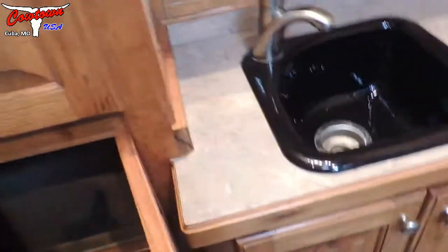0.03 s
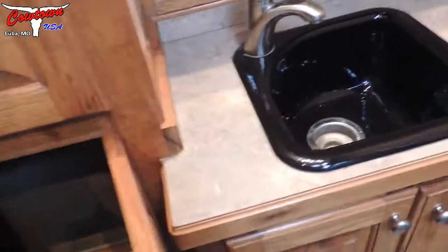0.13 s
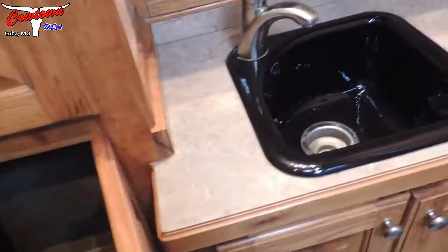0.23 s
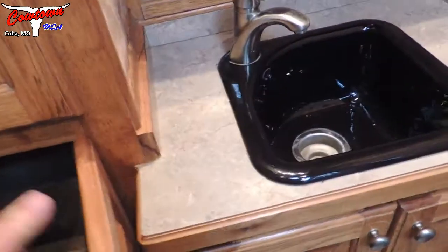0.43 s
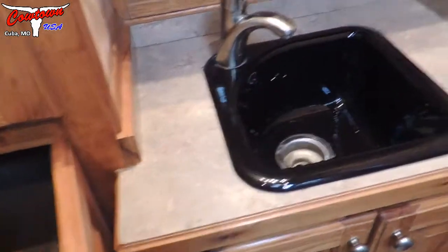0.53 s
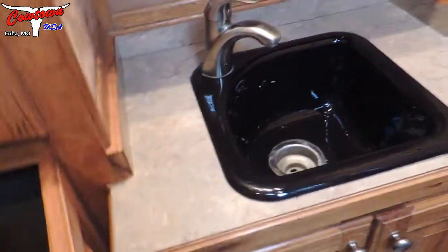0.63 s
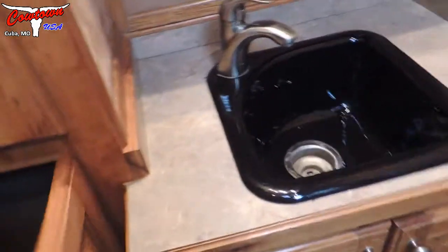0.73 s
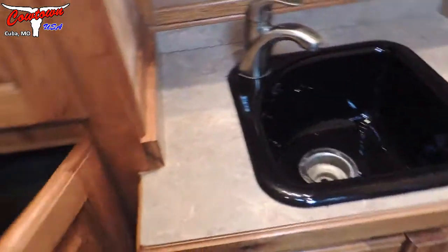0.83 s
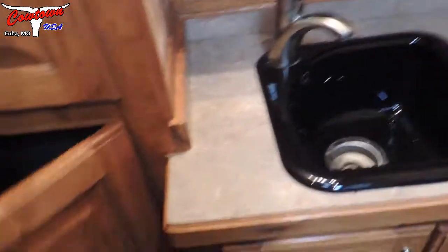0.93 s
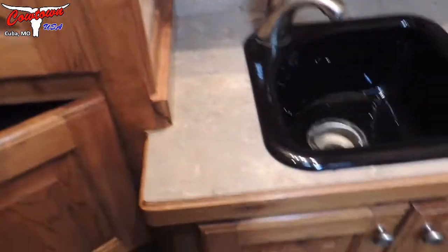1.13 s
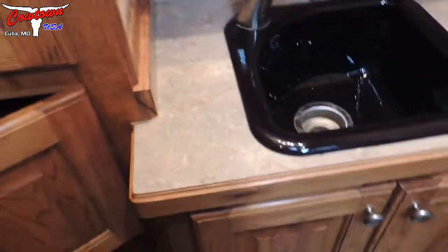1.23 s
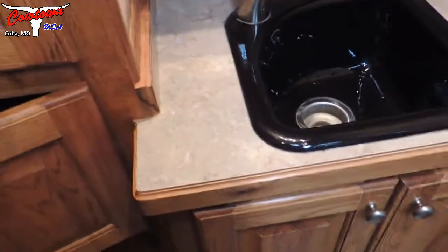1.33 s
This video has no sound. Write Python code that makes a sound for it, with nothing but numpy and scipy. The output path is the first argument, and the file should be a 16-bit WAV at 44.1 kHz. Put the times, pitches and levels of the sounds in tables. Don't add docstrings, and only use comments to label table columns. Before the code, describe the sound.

A wooden cabinet door slams shut with a light knock, catch snap and heavy booming bang

```python
import sys
import numpy as np
from scipy import signal
from scipy.fft import rfft, irfft
from scipy.io import wavfile
from scipy.ndimage import uniform_filter1d

SR = 44100
rng = np.random.default_rng(int(sys.argv[2]) if len(sys.argv) > 2 else 0)


def gain_from_decibels(decibels):
    exponent = np.asarray(decibels, float) / 20
    return 10 ** exponent


def generate_wav(sig):
    pcm = np.round(np.clip(np.atleast_2d(sig).T, -1, 1) * 32767).astype(np.int16)
    wavfile.write(sys.argv[1], SR, pcm)


N = 61739
T = np.arange(N) / SR
FREQ = np.maximum(np.fft.rfftfreq(N, 1 / SR), 1)
PORT_SIGN = np.array([[1], [-1]])

# (time [s], panel level [dB], catch snap level [dB], ring t60 [s], contact length [ms])
CONTACTS = [(0.0358, -26.5, -38.5, 0.06, 0.9), (0.0421, -29.5, -34, 0.024, 0.17),
            (.052, -27.5, -60.5, 0.087, 0.89), (.176, -31, -71, 0.041, 2.7), (0.1812, -22, -72, 0.089, 3.5),
            (.191, -27, -16.5, 0.05, .4), (.195, -15.5, -17, 0.019, .2), (.2, -10.5, -34.5, 0.0083, 0.23),
            (.2035, -1.5, -51, 0.011, .9), (.213, -10.5, 0.5, 0.082, 0.15), (0.2177, -8.5, -6.5, 0.044, .3),
            (.227, 1, -22.5, 0.013, 0.15), (.23, 10.5, -29.5, 0.091, 0.51), (.243, 1, -18.5, 0.03, 1.1),
            (0.254, 2.5, -31, 0.071, 2), (.262, -5, -21.5, 0.11, 1.5), (.274, -4, -46, 0.14, 2.4),
            (0.298, -12.5, -44, 0.02, 2.6), (0.329, -27, -51, 0.2, 0.87), (0.6929, -55, -41, .02, 0.35),
            (0.715, -64, -42.5, 0.022, 0.24)]
# (frequency [Hz], level [dB], t60 [s])
PANEL_MODES = [(317, -9.5, 0.053), (363.3, -5, .18), (399, -1, .2), (445, 2.5, 0.18), (510, -10, 0.084),
               (555, -16, 0.08), (619.6, -7.5, 0.081), (716, -7, 0.13), (913, -9.5, 0.2),
               (1100, -16.5, 0.18), (1227, -14, 0.1), (1420, -21.5, .14), (1727, -20, 0.26),
               (2200, -24, 0.033)]
# (frequency [Hz], density [dB per Hz])
SNAP_SPECTRUM = [(800, -38), (3000, 1.5), (5500, 2.5), (7000, -1), (8500, -7.5), (11000, -1), (14000, -1.5)]
# (frequency [Hz], density [dB per Hz])
KNOCK_SPECTRUM = [(250, -34.5), (340, -19), (420, -3), (560, -11), (1000, -10.5), (2200, -12.5),
                  (2900, -20.5), (9000, -29.5)]
# (time [s], level [dB], frequency [Hz], t60 [s])
CARCASS_BOOMS = [(0.048, -7, 76, 0.067), (.048, -27, 224.3, .25), (0.065, -13.5, 84.8, 0.12),
                 (.118, -10, 70.6, 0.064), (0.195, -12, 80, 0.1), (0.212, -11, 121, 0.27),
                 (0.224, -4, 191.5, 0.25), (0.246, -8, 154.7, .14), (.24, 1, 77.1, 0.096),
                 (.268, 7, 52.7, .1), (.272, -9, 193, 0.15), (0.32, -14, 141.7, 0.225),
                 (0.325, -1.5, 78.5, 0.08), (0.395, -14, 58, 0.14), (.435, -18, 62, 0.074)]
# (time [s], level [dB], frequency [Hz], t60 [s])
FOOT_THUMPS = [(0.621, -29, 48, .06), (.668, -25.5, 60, 0.21), (.688, -16, 51.6, 0.096),
               (0.776, -25, 95, .06), (0.843, -31, 71.4, 0.055), (0.919, -27.5, 72, .1),
               (1.092, -44, 44.5, 0.12), (1.248, -31.5, 60, 0.14), (1.303, -18.5, 60, 0.033),
               (1.336, -18, 54.3, 0.037), (1.367, -30, 40, 0.14)]
# (frequency [Hz], t60 [s])
CABIN_DECAY = [(100, 0.38), (500, 0.24), (2000, 0.16), (8000, 0.21), (14000, 0.033)]
# (time [s], length [s], level
# [dB], centre [Hz], width [Hz])
BRUSHES = [(-.10, 0.35, -43, 2200, 1935), (-.09, 0.31, -46.5, 6500, 6000), (.036, 0.02, -28.5, 2756, 1480),
           (0.647, 1.44, -53.5, 1100, 900), (0.671, 0.31, -49, 1870, 354), (0.698, .28, -49, 2740, 600),
           (0.722, 0.19, -48, 617, 245), (0.79, 1.1, -67.5, 7990, 6000), (0.857, 0.02, -61, 1823, 60),
           (0.879, 0.03, -40, 470, 40), (0.907, .06, -49, 1600, 250), (0.938, 0.017, -41.5, 488, 40),
           (1.003, 0.074, -52.5, 10130, 6000), (1.008, 0.047, -45, 229.7, 29.5),
           (1.054, 0.063, -49, 5590, 1100), (1.04, 0.057, -49.5, 1764, 60), (1.111, 0.35, -48.5, 2650, 620),
           (1.131, 0.21, -51, 11420, 7560), (1.17, .11, -47.5, 457, 60), (1.335, 0.15, -55, 6600, 2000),
           (1.344, .12, -51.5, 12000, 2000)]
# (frequency [Hz], density [dB per Hz])
AIR_SPECTRUM = [(71, -43.5), (120, -5.5), (331, -9.5), (366, -7), (534, -8.5), (1480, -22), (1990, -27),
                (2430, -22.5), (14000, -35)]

PANEL_LOW_HZ, PANEL_LEVEL_SCATTER_DB, PANEL_PITCH_SCATTER = 330, 2.5, 0.0072
KNOCK_DB, KNOCK_T60_S = -5, 0.036
SNAP_T60_S, CRACK_DB, CRACK_T60_S = 0.019, 3, 0.0062
ROOM_DB, ROOM_TILT, ROOM_ALIKE_HZ, ROOM_DELAY_S = -3, 0.57, 900, 0.0022
AIR_DB, AIR_FLICKER_DB = -44, 0.5
RUMBLE_HZ, RUMBLE_WIDTH_HZ, RUMBLE_DB = 60, 47, -35.5
RUMBLE_SWING_DB, RUMBLE_FADE_DB_S = 0.5, -19
BASS_SIDE_DB = -16
PORT_LAG_S, PORT_TILT_DB = 1.3e-4, 10
DUCK_S, DUCK_DB, DUCK_FALL_S, HOLD_S, RECOVER_DB_S = 0.24, -11, 0.05, 0.19, 14.5
MIC_LOW_HZ, TOP_HZ = 40, 14050
CLIP_LEVEL, CLIP_KNEE = 0.94, 6


def door():
    out = np.zeros(N)
    snap = noise(SNAP_SPECTRUM)[0]
    knock = noise(KNOCK_SPECTRUM)[0]
    for t0, panel_db, snap_db, ring_s, contact_ms in CONTACTS:
        wood = panel(t0, ring_s) + gain_from_decibels(KNOCK_DB) * knock * fade(t0, KNOCK_T60_S)
        catch = snap * (fade(t0, SNAP_T60_S) + gain_from_decibels(CRACK_DB) * fade(t0, CRACK_T60_S))
        out += soften(gain_from_decibels(panel_db) * wood, contact_ms) + gain_from_decibels(snap_db) * catch
    return signal.sosfilt(signal.butter(2, PANEL_LOW_HZ, "high", fs=SR, output="sos"), out)


def panel(t0, ring_s):
    out = np.zeros(N)
    for hz, db, t60 in PANEL_MODES:
        level_chance, pitch_chance = rng.standard_normal(2)
        mode_hz = hz * (1 + PANEL_PITCH_SCATTER * pitch_chance)
        mode_db = db + PANEL_LEVEL_SCATTER_DB * level_chance
        out += gain_from_decibels(mode_db) * ring(t0, mode_hz, ring_s * t60 / 0.33)
    return out


def soften(x, contact_ms):
    samples = contact_ms * SR / 1000
    soft = np.exp(-2 / (samples / 4 + 1))
    return signal.lfilter([1 - soft], [1, -soft], x)


def booms():
    out = np.zeros(N)
    for events in (CARCASS_BOOMS, FOOT_THUMPS):
        for t0, db, hz, t60 in events:
            build_up = 1 - fade(t0, 3 / hz)
            out += gain_from_decibels(db) * ring(t0, hz, t60) * build_up
    return out


def room(x):
    hz, t60 = np.array(CABIN_DECAY).T
    tail = np.zeros((2, N))
    for f in 70 * 2 ** np.arange(0, 8, 0.5):
        mid, side = band(f, f / 4, channels=2)
        pair = mid + min(f / ROOM_ALIKE_HZ, 1) ** 2.5 * side * PORT_SIGN
        tail += f ** ROOM_TILT * pair * fade(ROOM_DELAY_S, np.interp(np.log(f), np.log(hz), t60))
    tail = tail[:, :SR // 2] / np.sqrt(np.sum(tail ** 2) / 2)
    return gain_from_decibels(ROOM_DB) * signal.fftconvolve(x[None], tail)[:, :N]


def rustles():
    out = np.zeros(N)
    for t0, length, db, hz, width in BRUSHES:
        swell = np.sin(np.pi * np.clip((T - t0) / length, 0, 1)) ** 0.4
        out += gain_from_decibels(db + 1.9 * walk(40)) * swell * band(hz, width)[0]
    return out


def air():
    mid, left, right = noise(AIR_SPECTRUM, channels=3)
    apart = irfft(rfft(np.array([left, right])) * np.clip(FREQ / 2500, 0, 0.8), N)
    return gain_from_decibels(AIR_DB + AIR_FLICKER_DB * walk(24)) * (ports(mid) + apart)


def rumble():
    level_db = RUMBLE_DB + RUMBLE_FADE_DB_S * np.abs(T - 0.5) + RUMBLE_SWING_DB * walk(30)
    return gain_from_decibels(level_db) * band(RUMBLE_HZ, RUMBLE_WIDTH_HZ)[0]


def ports(x):
    advance = np.exp(1j * np.pi * FREQ * PORT_LAG_S * PORT_SIGN)
    tilt = gain_from_decibels(PORT_SIGN * PORT_TILT_DB * FREQ / 20000)
    return irfft(rfft(x) * advance * tilt, N)


def ring(t0, hz, t60):
    return fade(t0, t60) * np.sin(2 * np.pi * hz * (T - t0))


def fade(t0, t60):
    return (T >= t0) * gain_from_decibels(-60 * np.maximum(T - t0, 0) / t60)


def noise(table, channels=1):
    hz, db = np.array(table).T
    colour = gain_from_decibels(np.interp(np.log(FREQ), np.log(hz), db, left=-60))
    return unit(irfft(rfft(rng.standard_normal((channels, N))) * colour, N))


def band(hz, width, channels=1):
    bell = np.exp(-((FREQ - hz) / width) ** 2)
    return unit(irfft(rfft(rng.standard_normal((channels, N))) * bell, N))


def walk(rate):
    k = int(SR / rate)
    return unit(uniform_filter1d(uniform_filter1d(rng.standard_normal(N), k), k))


def unit(x):
    return x / np.sqrt(np.mean(x ** 2))


def scene():
    close = door()
    bass = booms() + rumble()
    lean = 1 + gain_from_decibels(BASS_SIDE_DB) * walk(60) * PORT_SIGN
    return ports(close + rustles()) + room(close) + air() + bass * lean


def roll_off(x):
    return signal.sosfilt(signal.butter(12, 14420, fs=SR, output="sos"), x)


def record(dry):
    duck = DUCK_DB * np.clip((T - DUCK_S) / DUCK_FALL_S, 0, 1)
    recovery = np.maximum(T - DUCK_S - HOLD_S, 0) * RECOVER_DB_S
    gain_db = np.minimum(duck + recovery, 0)
    x = signal.sosfilt(signal.butter(3, MIC_LOW_HZ, "high", fs=SR, output="sos"), dry)
    x = x * gain_from_decibels(gain_db) / CLIP_LEVEL
    x = CLIP_LEVEL * x / (1 + np.abs(x) ** CLIP_KNEE) ** (1 / CLIP_KNEE)
    x = signal.sosfilt(signal.ellip(8, 0.2, 70, TOP_HZ, fs=SR, output="sos"), x)
    return roll_off(np.clip(x, -1, 1))


dry = scene()
out = record(dry)
generate_wav(out)
```